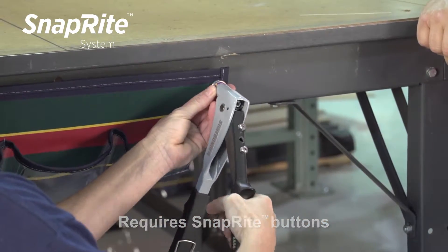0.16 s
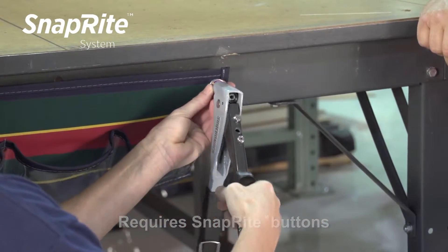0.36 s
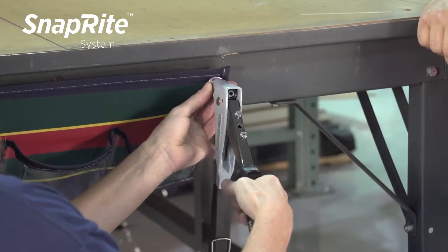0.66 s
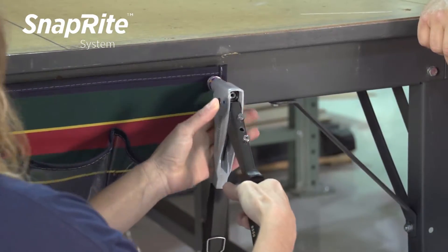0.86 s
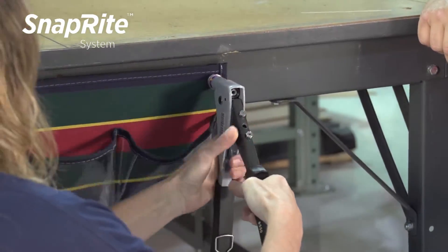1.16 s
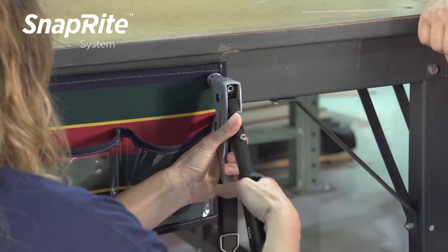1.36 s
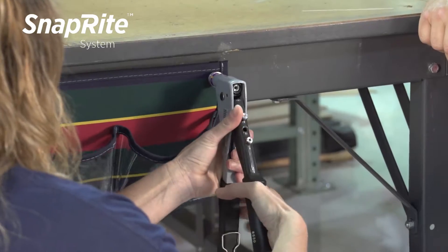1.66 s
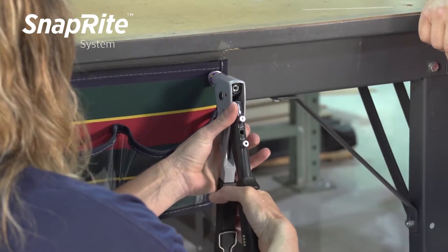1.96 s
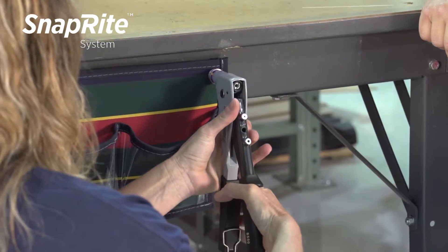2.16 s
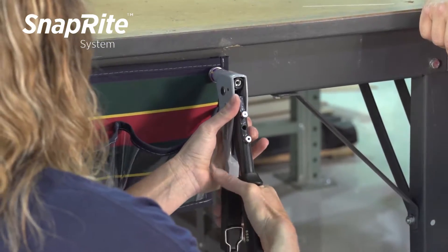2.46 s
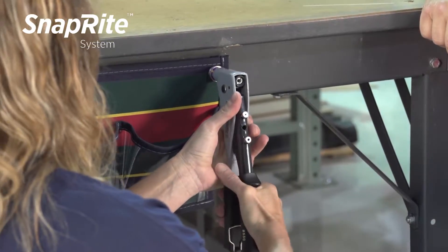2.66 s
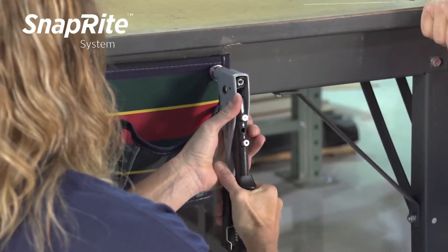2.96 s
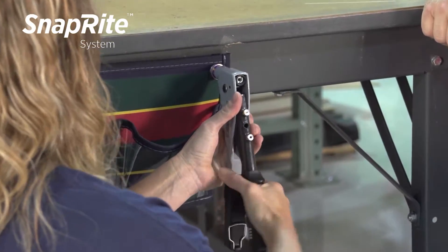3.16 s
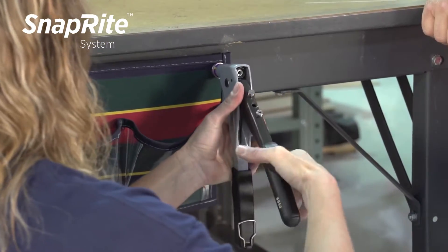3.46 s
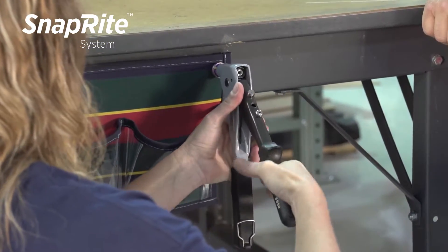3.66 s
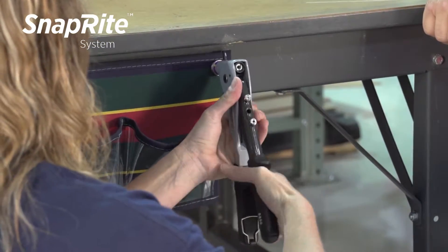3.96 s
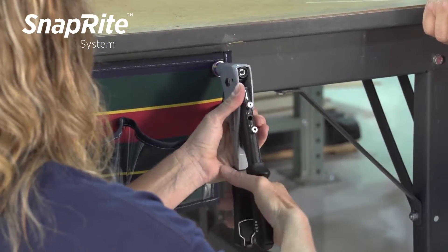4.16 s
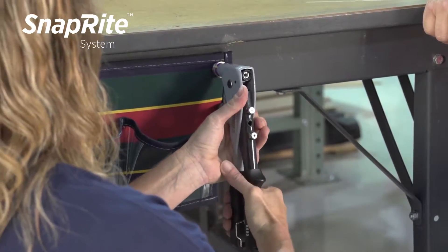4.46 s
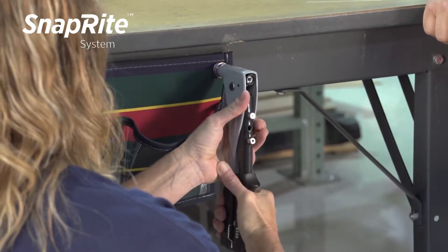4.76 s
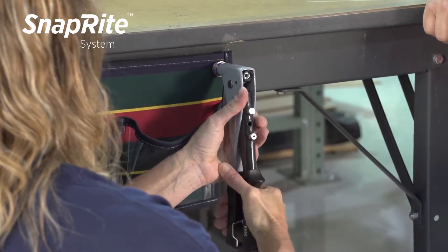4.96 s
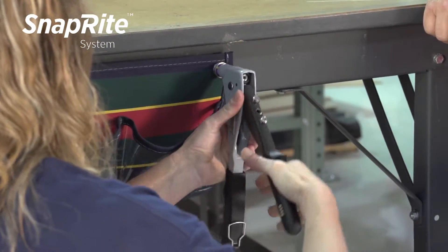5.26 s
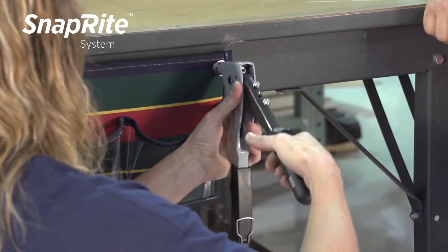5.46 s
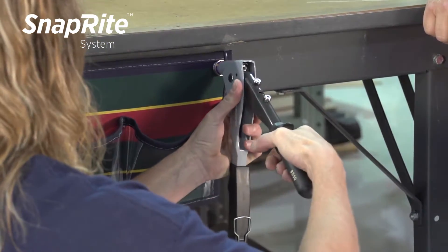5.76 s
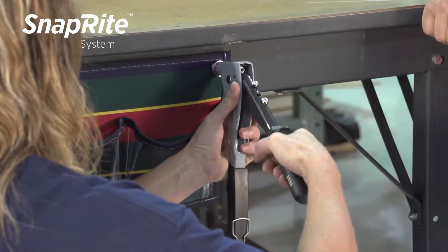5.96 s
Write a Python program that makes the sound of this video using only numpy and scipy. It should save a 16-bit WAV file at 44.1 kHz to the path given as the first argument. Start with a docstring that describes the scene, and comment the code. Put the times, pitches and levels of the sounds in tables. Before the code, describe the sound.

Sharp steel clicks and ringing clacks come from a hand riveter worked against a metal table, with faint ventilation hum behind.

```python
"""Ventilation and mains hum in a large, quiet workshop; a hand rubs on a grip, then steel clicks.
A hand rivet tool is squeezed three times against the steel frame of a table. The jaws slip and click,
the stem groans and snaps, the handles clack open against their stops. Each contact rings tool and
frame; knocks make the table top boom. Air hisses a few times far off in the hall."""
import sys
import numpy as np
from scipy import signal
from scipy.fft import rfft, irfft, next_fast_len
from scipy.io import wavfile

SR = 44100
rng = np.random.default_rng(int(sys.argv[2]) if len(sys.argv) > 2 else 0)


def master_out(mix):
    """Clip the mix to full scale and print it as 16-bit PCM to the path in sys.argv[1]."""
    frames = np.transpose(np.atleast_2d(mix))
    ceiling = np.clip(frames, -1, 1)
    pcm = np.round(ceiling * 32767).astype(np.int16)
    wavfile.write(sys.argv[1], SR, pcm)


N = 269451

# noise spectra (frequency [Hz], relative density [dB])
VENT_SPECTRUM = [(15, -11.5), (25, -9), (70, 2.5), (123, -2), (145, -2.5), (242, -13.5), (263, -11),
                 (489, -14.5), (796, -14.5), (1740, -19.5), (2410, -20.5), (6740, -29.5), (8830, -37),
                 (11600, -40.5), (16000, -34.5)]
RUMBLE_SPECTRUM = [(25, -27), (45, 5), (70, 11), (100, 4), (150, -3), (220, -1), (400, -57)]
RUSH_SPECTRUM = [(100, -22), (300, 0.5), (800, 0), (1400, 0.5), (2300, -4), (4500, -6.5), (6500, -10.5),
                 (10000, -19.5), (16000, -31)]
NOZZLE_SPECTRUM = [(2000, -12.5), (4000, -6.5), (5600, -5), (6150, 2), (6700, -4), (7500, -13), (8100, -15),
                   (9200, -20), (12300, -24), (16000, -39)]
RUB_SPECTRUM = [(100, -28), (300, 7.5), (1000, 4.5), (2500, -3.5), (6000, -9.5), (9000, -15.5),
                (15000, -26)]
# rumble envelope (time [s], relative level [dB])
RUMBLE_ENVELOPE = [(0.0, -71), (0.87, -67), (1.31, -74), (2.72, -51.5), (5.16, -54), (6.08, -51),
                   (6.11, -47)]
# lamp hum and buzz (frequency [Hz], rms level [dB])
HUM_PARTIALS = [(120, -60.5), (240, -66.5), (480, -74.5), (1680, -72), (1800, -71.5), (4080, -81.5),
                (4800, -78.5), (5400, -80), (6120, -84), (6360, -85), (6600, -81), (6720, -78)]
# narrow background hiss (centre [Hz], width [Hz], rms level [dB])
HISS_BANDS = [(7400, 440, -88.5), (8500, 400, -85.5), (11380, 320, -82.5)]
# reverberation, table and floor / hall (frequency [Hz], T60 [s])
NEAR_DECAY = [(100, 0.87), (400, 0.45), (1500, 0.24), (4000, 0.13), (8000, 0.22), (16000, 0.19)]
HALL_DECAY = [(100, 4.9), (1000, 1.57), (4000, 1.82), (8000, 1.26), (16000, 2.7)]
# far air (time [s], rush [dB], nozzle hiss [dB], rise [s], decay [s])
AIR_PUFFS = [(1.85, -38, -63, 0.021, 0.077), (2.14, -53, -72, 0.05, 0.9), (2.363, -41.5, -50, 0.03, 0.051),
             (5.811, -66, -50.5, 0.03, 0.078), (5.861, -54.5, -74, 0.081, 0.16)]
# tool pulling at the table top (time [s], level [dB], half-width [s])
TABLE_TUGS = [(0.474, -54.5, 0.11), (0.887, -46.5, 0.034), (1.901, -48, 0.046), (3.362, -50, .035)]
# hands sliding on the tool (time [s], level [dB], half-width [s], treble [dB])
GRIP_RUBS = [(0.224, -60, 0.15, -13.5), (0.483, -53.5, 0.036, 6), (0.653, -60, 0.078, -16),
             (1.365, -61, 0.056, -12), (3.37, -62, 0.15, 0.5), (4.443, -66.5, 0.27, 6.5),
             (4.864, -59, 0.14, -10)]
# jaws and stem under load (time [s], level [dB], half-width [s], pitch [Hz], waver [Hz])
STEM_SQUEALS = [(1.79, -59.5, 0.02, 2950, 200), (1.8755, -29.5, 0.0037, 850, 87),
                (1.882, -46, 0.014, 800, 216), (1.868, -42, 0.0056, 1290, 147)]
# tool and frame resonances (frequency [Hz], width [Hz], gain [dB])
STEEL_MODES = [(326.5, 16.4, 4.5), (448, 14.5, 4), (501.2, 16, 7), (734, 15, 4.5), (945, 14, 2),
               (995, 19, 4.5), (1236, 16, 5.5), (1314, 17, -10), (1666, 72, -5.5), (1990, 30, -1),
               (2450, 8.2, -18), (2680, 22, -14), (2840, 34, -12.5), (3030, 10, -26), (3380, 6.9, -28),
               (4330, 150, -8), (4730, 17, 7), (5550, 110, 1.5), (6170, 17, -13), (9000, 17, -23)]
# handles and stem on their stops (time [s], level [dB], chatter [s], weight [dB], treble [dB], ping [Hz])
STOP_KNOCKS = [ (0.755, -6.5, 0.021, 1, -18, 1050), (0.7847, 1, .0095, -1.5, -20, 508),
               (1.907, 5.5, 0.0043, -10, -6, 4840), (1.919, 5, 0.0088, -7, -12, 2750),
               (3.217, -9, .009, 0, -34, 1410), (3.242, -11.5, 0.015, 7.5, -47, 1160),
               (3.41, -25.5, 0.025, 17, -23, 393), (3.583, -22, .02, 13, -22, 345),
               (4.0129, -6.5, 0.0058, -2, 3, 5400), (4.0236, -0.5, 0.004, 1, -9, 2780),
               (5.142, -8.5, 0.0083, 6.5, -13, 1390), (5.153, -9.5, .012, 9.5, -17, 830),
               (5.240, -13.5, .01, 4, -23, 2410), (5.333, -10, 0.0082, 4, -9, 1380),
               (5.351, -8.5, 0.01, 7, -28, 1120), (5.372, -10.5, 0.0091, 6.5, -10.5, 426)]
# jaws catching, then seating (time [s], catch [dB], seat [dB], treble [dB], catch ping [Hz])
JAW_CLICKS = [ (0.508, -27.5, -28, 2, 6230), (0.525, -24, -35, -17, 5840), (0.748, 3, -6, 2, 4620),
              (1.342, -31, -33, -10, 3750), (1.402, -25.5, -22, -8.5, 3420), (1.904, -3, 0.5, 6.5, 2830),
              (3.212, -13, -14, -5, 2800), (3.955, -13, -15, -21, 4050), (3.9696, -8.5, -13, -8.5, 1850),
              (4.0222, -0.5, -7, 2.5, 2770), (5.080, -9, -8, -20.5, 2800), (5.346, -17, -25, -3.5, 9500)]


def from_db(db):
    """Decibels to gain."""
    return 10 ** (np.asarray(db) / 20)


def rms_one(x):
    """Scale to unit rms."""
    return x / np.sqrt(np.mean(x ** 2) + 1e-20)


def seconds():
    """Sample times."""
    return np.arange(N) / SR


def at_hz(points, hz):
    """Table lookup on a log-frequency axis."""
    table_hz, values = np.transpose(points)
    return np.interp(np.log(np.maximum(hz, 1)), np.log(table_hz), values)


def cut(x, hz, kind, order=2):
    """Causal Butterworth filter."""
    sos = signal.butter(order, np.clip(hz, 10, .45 * SR), kind, fs=SR, output="sos")
    return signal.sosfilt(sos, x + 1e-18)


def noise(spectrum):
    """Shaped noise, unit rms."""
    size = next_fast_len(N)
    hz = np.arange(size // 2 + 1) * SR / size
    shaped = rfft(rng.standard_normal(size)) * from_db(at_hz(spectrum, hz))
    return rms_one(irfft(shaped, size)[:N])


def resonate(x, hz, width_hz):
    """Two-pole resonance, unit peak gain."""
    r = np.exp(-np.pi * width_hz / SR)
    feedback = [1, -2 * r * np.cos(2 * np.pi * hz / SR), r * r]
    return signal.lfilter(np.array([1, 0, -1]) * (1 - r * r) / 2, feedback, x + 1e-18)


def swell(time_s, half_width_s):
    """Gaussian envelope."""
    return np.exp(-.5 * np.minimum(((seconds() - time_s) / half_width_s) ** 2, 100))


def wavering(hz, waver_hz):
    """Tone with fast random pitch wander, unit rms."""
    wander = rms_one(cut(rng.standard_normal(N), 187.0, "low"))
    pitch_hz = hz + waver_hz * .5 * wander
    return rms_one(np.sin(2 * np.pi * np.cumsum(pitch_hz) / SR))


def add(track, time_s, sound):
    """Mix in place at time_s."""
    start = round(time_s * SR)
    track[start:start + len(sound)] += sound


def reverberate(x, decay, build_s, dull_hz):
    """Diffuse reflections build up, then die at a separate rate per octave."""
    t = np.arange(int(1.5 * SR)) / SR
    edges_hz = np.geomspace(70, 18000, 9)
    tail = np.zeros(len(t))
    for low, high in zip(edges_hz, edges_hz[1:]):
        band = cut(rng.standard_normal(len(t)), [low, high], "band")
        tail += band * from_db(-60 * t / at_hz(decay, np.sqrt(low * high)))
    tail = rms_one(tail * (1 - np.exp(-t / build_s))) / np.sqrt(len(t))
    return signal.fftconvolve(x, cut(tail, dull_hz, "low", order=1))[:N]


def background(vent_db=-54, rumble_trim_db=-5):
    """Ventilation, wandering rumble, lamp hum, thin bands of hiss."""
    t = seconds()
    vent = from_db(vent_db) * cut(noise(VENT_SPECTRUM), 11400, "low")
    rumble_db = np.interp(t, *np.transpose(RUMBLE_ENVELOPE)) + rumble_trim_db
    rumble = from_db(rumble_db) * noise(RUMBLE_SPECTRUM)
    hum = sum(from_db(db) * np.sqrt(2) * np.sin(2 * np.pi * (hz * t + rng.random()))
              for hz, db in HUM_PARTIALS)
    hiss = sum(from_db(db) * rms_one(resonate(rng.standard_normal(N), hz, width_hz))
               for hz, width_hz, db in HISS_BANDS)
    return vent + rumble + hum + hiss


def far_air(hall_db=-4):
    """Puffs open fast, lose pressure, linger in the hall."""
    rush, nozzle, air = noise(RUSH_SPECTRUM), noise(NOZZLE_SPECTRUM), np.zeros(N)
    for time_s, rush_db, nozzle_db, rise_s, decay_s in AIR_PUFFS:
        age_s = seconds() - time_s
        flow = np.clip(age_s / rise_s, 0, 1) * np.exp(-np.maximum(age_s - rise_s, 0) / decay_s)
        air += flow * (from_db(rush_db) * rush + from_db(nozzle_db) * nozzle)
    return air + from_db(hall_db) * reverberate(air, HALL_DECAY, build_s=0.0053, dull_hz=7850)


def table_booms(boom_hz=180.5, boom_gain_db=-55.5, lag_s=0.022, tug_hz=131, waver_hz=70):
    """The table top booms softly under each knock's weight and each tug of the tool."""
    booms = sum(from_db(boom_gain_db + db + weight_db) * swell(time_s + lag_s, half_width_s=.028)
                for time_s, db, _, weight_db, _, _ in STOP_KNOCKS)
    tugs = sum(from_db(db) * swell(time_s, half_width_s) for time_s, db, half_width_s in TABLE_TUGS)
    return booms * wavering(boom_hz, waver_hz) + tugs * wavering(tug_hz, waver_hz)


def grip_rubs(grain_db=3):
    """Grainy skin friction on the grip; each rub has its own brightness."""
    friction = noise(RUB_SPECTRUM)
    friction *= from_db(grain_db * rms_one(cut(rng.standard_normal(N), 150, "low")))
    dull = cut(friction, 3800, "low", order=1)
    treble = friction - dull
    return sum(from_db(db) * swell(time_s, half_width_s) * (dull + from_db(treble_db) * treble)
               for time_s, db, half_width_s, treble_db in GRIP_RUBS)


def stem_squeals():
    """Loaded steel sticks and slips at a wavering rate."""
    return sum(from_db(db) * swell(time_s, half_width_s) * wavering(hz, waver_hz)
               for time_s, db, half_width_s, hz, waver_hz in STEM_SQUEALS)


def chatter(decay_s, rebounds_per_s=8000, first_touch=0.88, soft_s=0.013):
    """One touch and a dying train of rebounds, unit energy; slow contacts grind in softly."""
    t = np.arange(SR // 5) / SR
    touches = rng.choice([-1, 1], len(t)) * rng.uniform(0.4, 1, len(t))
    touches *= rng.random(len(t)) < rebounds_per_s / SR
    rise_s = 0.46 * decay_s ** 2 / soft_s
    touches *= 1 - np.exp(-t / rise_s)
    touches[0] = first_touch * np.exp(-decay_s / soft_s)
    touches *= np.exp(-t / decay_s)
    return touches / np.linalg.norm(touches)


def contact(chatter_s, thud_db, treble_db, ping_hz, ping_db, ping_q=18, sparkle_db=-10):
    """Handles clack, the frame thuds, hard faces crack, the small struck part pings."""
    touches = chatter(chatter_s)
    clack = cut(touches, [720, 2600], "band")
    thud = from_db(thud_db) * cut(touches, [220, 660], "band")
    treble = cut(touches, 3500, "high")
    dull = cut(treble, 3300, "low", order=1)
    crack = from_db(treble_db) * (dull + from_db(sparkle_db) * (treble - dull))
    hit = clack - thud - crack  # adjacent bands in opposite phase
    return hit + from_db(ping_db) * resonate(hit, ping_hz, ping_hz / ping_q)


def steel_ring(force):
    """All contacts ring the same tool and frame."""
    return force + sum(from_db(db) * resonate(force, hz, width_hz) for hz, width_hz, db in STEEL_MODES)


def stop_knocks():
    """Handles and stem rattle on their stops; more weight, more thud."""
    force = np.zeros(N + SR)
    for time_s, db, chatter_s, weight_db, treble_db, ping_hz in STOP_KNOCKS:
        knock = contact(chatter_s, weight_db, treble_db, ping_hz, ping_db=5.5, ping_q=8)
        add(force, time_s, from_db(db) * knock)
    return force[:N]


def jaw_clicks(catch_s=0.00032, seat_lag_s=0.0021, seat_s=0.0011, thud_db=-12.5, jaw_hz=4350):
    """Jaws catch hard, then seat with a short chatter; lighter clicks ping more purely."""
    force = np.zeros(N + SR)
    for time_s, catch_db, seat_db, treble_db, ping_hz in JAW_CLICKS:
        catch = contact(catch_s, thud_db, treble_db, ping_hz, ping_db=5 - 0.62 * max(catch_db, seat_db))
        seat = contact(seat_s, thud_db, treble_db, jaw_hz, ping_db=-0.5 - 0.52 * seat_db)
        add(force, time_s, from_db(catch_db) * catch)
        add(force, time_s + seat_lag_s, from_db(seat_db) * seat)
    return force[:N]


def scene(direct_db=-1, near_db=-5, hall_db=-21):
    """Tool close by; table and floor reflect first, the hall faintly after. Mono."""
    tool = steel_ring(jaw_clicks() + stop_knocks()) + stem_squeals() + grip_rubs()
    near = from_db(near_db) * reverberate(tool, NEAR_DECAY, build_s=0.0014, dull_hz=6130)
    hall = from_db(hall_db) * reverberate(tool, HALL_DECAY, build_s=0.0042, dull_hz=4000)
    return (from_db(direct_db) * tool + near + hall + table_booms() + far_air() + background())[None]


def record(dry):
    """Steep low-pass at 16 kHz."""
    return signal.sosfilt(signal.ellip(10, .2, 80, 16000, fs=SR, output="sos"), dry)


dry = scene()
out = record(dry)
master_out(out)
```